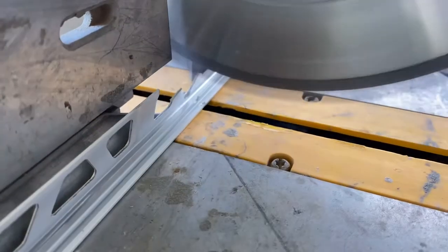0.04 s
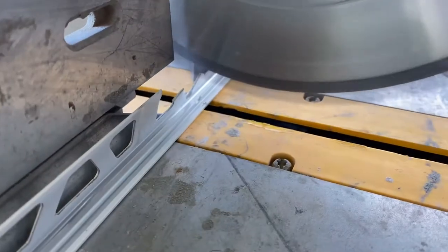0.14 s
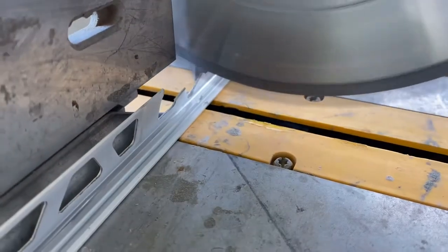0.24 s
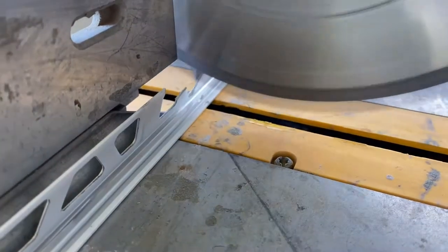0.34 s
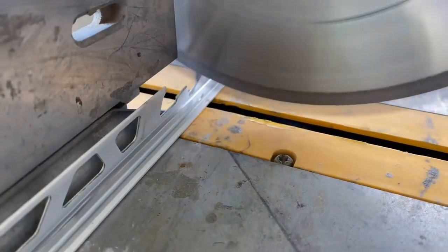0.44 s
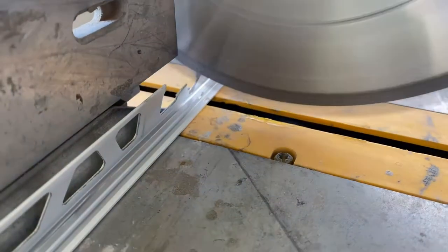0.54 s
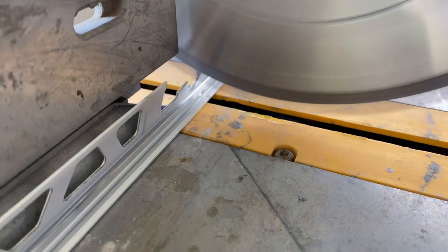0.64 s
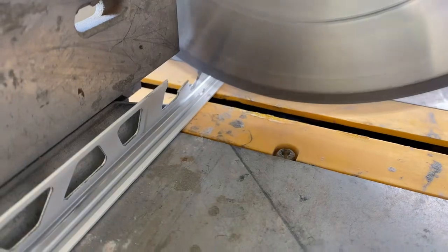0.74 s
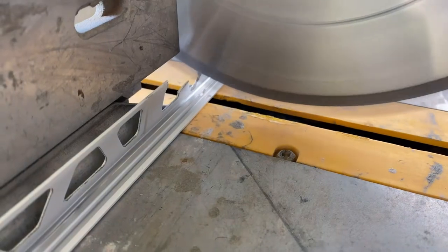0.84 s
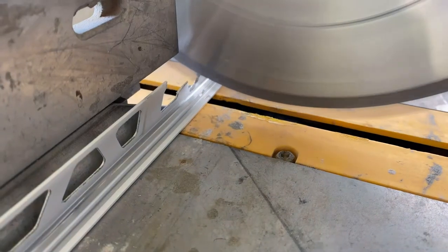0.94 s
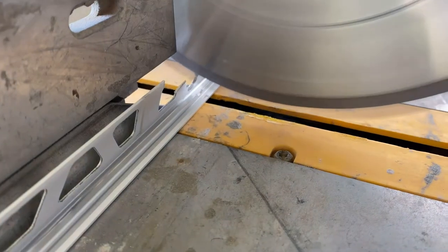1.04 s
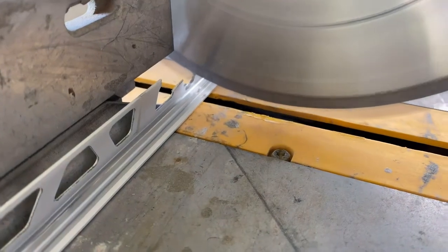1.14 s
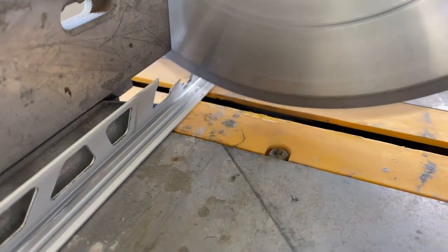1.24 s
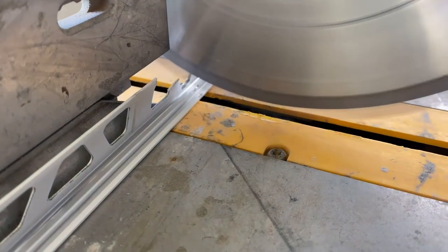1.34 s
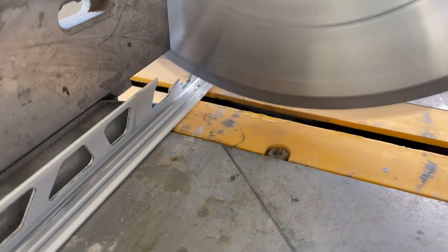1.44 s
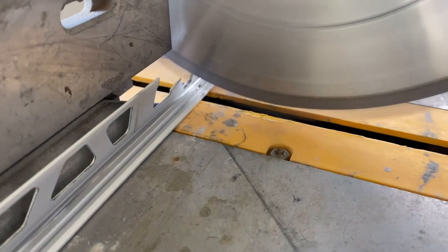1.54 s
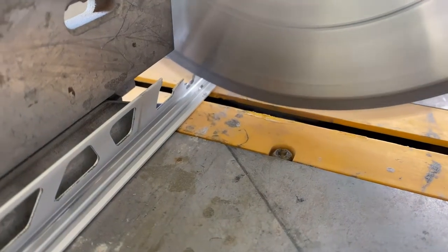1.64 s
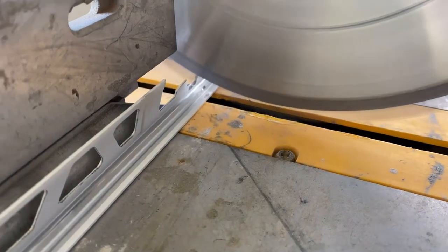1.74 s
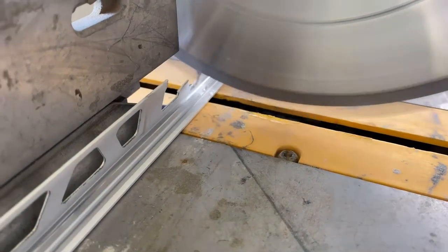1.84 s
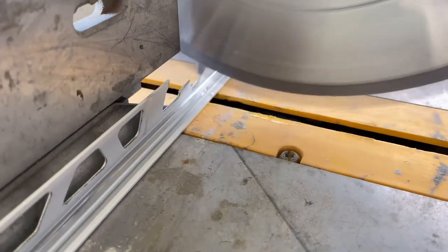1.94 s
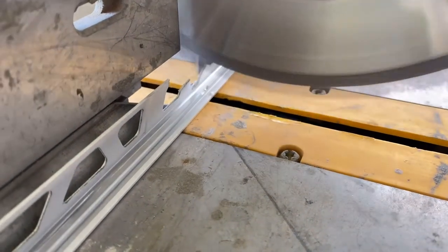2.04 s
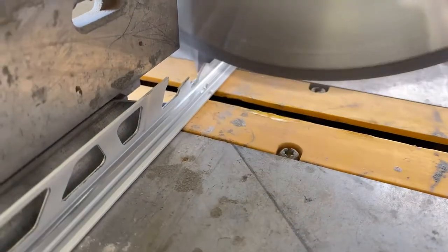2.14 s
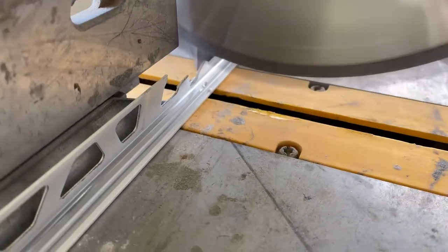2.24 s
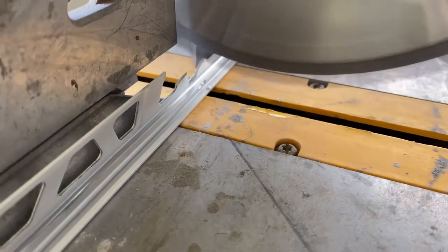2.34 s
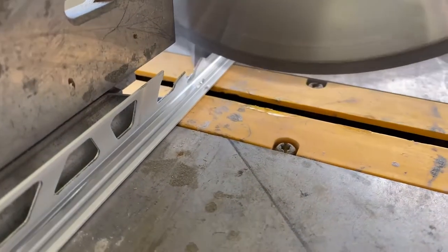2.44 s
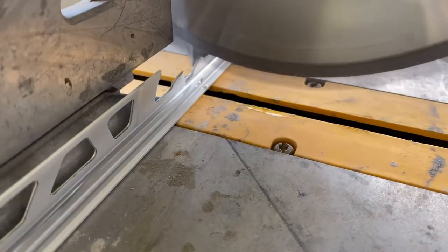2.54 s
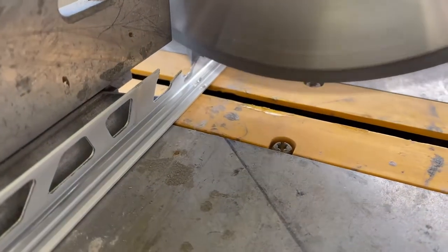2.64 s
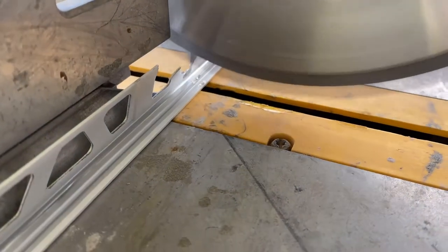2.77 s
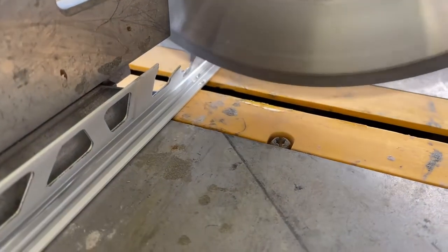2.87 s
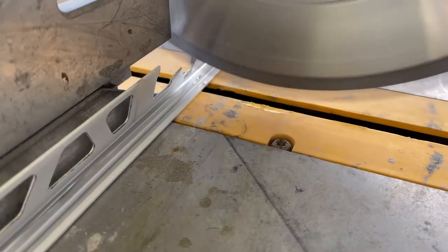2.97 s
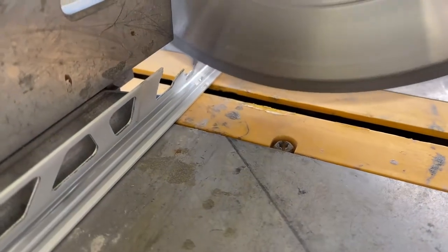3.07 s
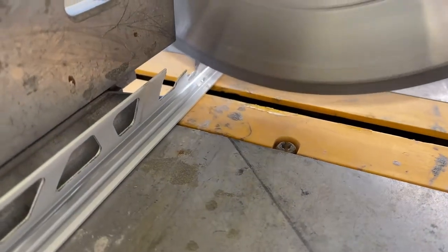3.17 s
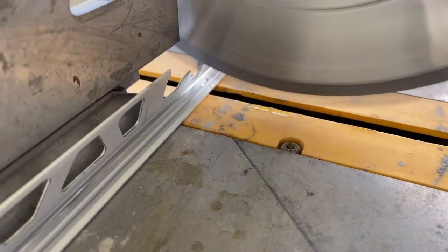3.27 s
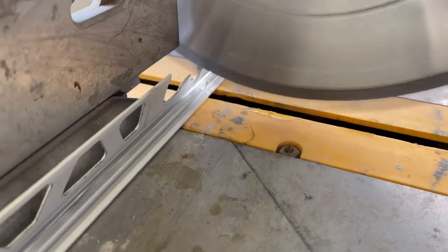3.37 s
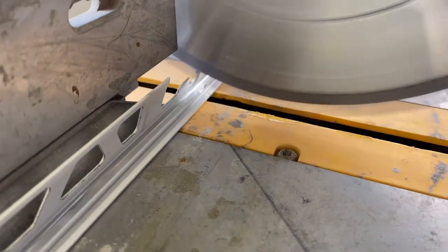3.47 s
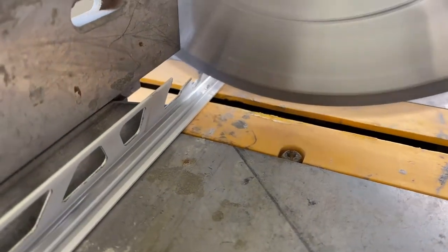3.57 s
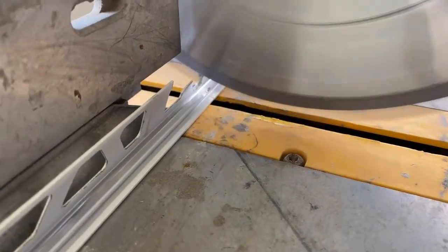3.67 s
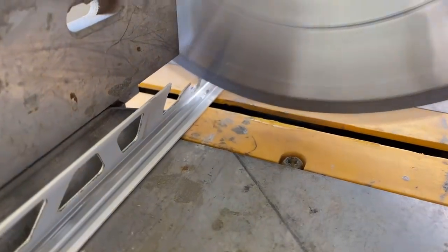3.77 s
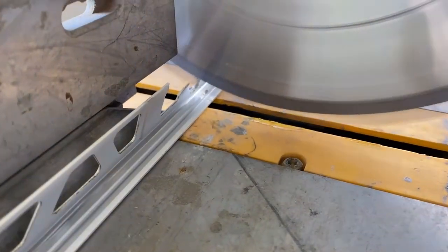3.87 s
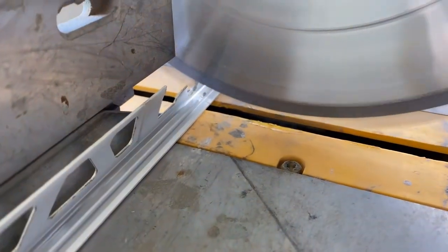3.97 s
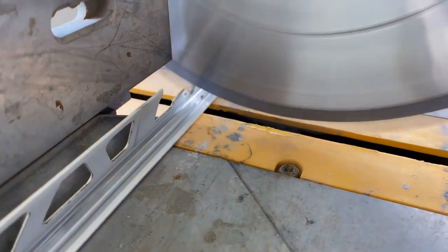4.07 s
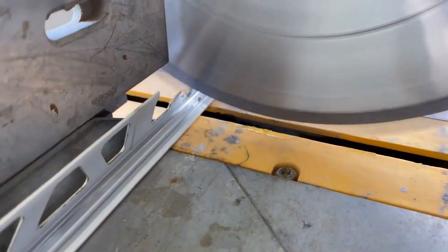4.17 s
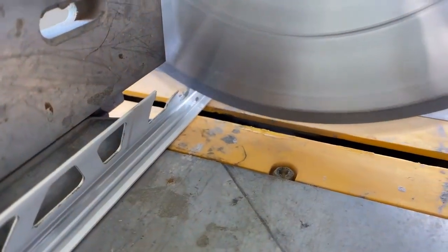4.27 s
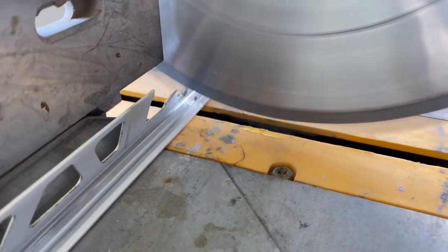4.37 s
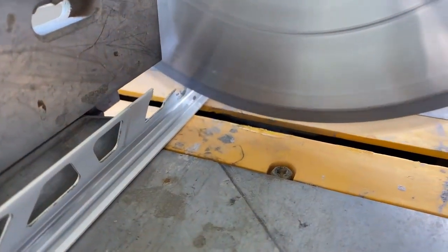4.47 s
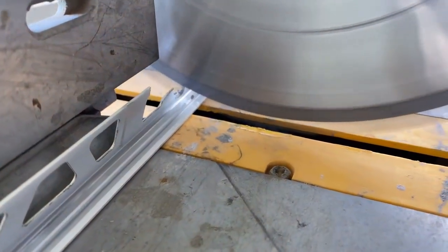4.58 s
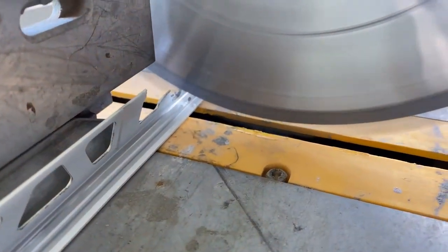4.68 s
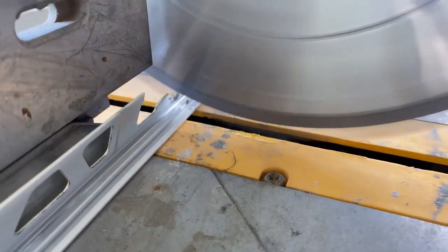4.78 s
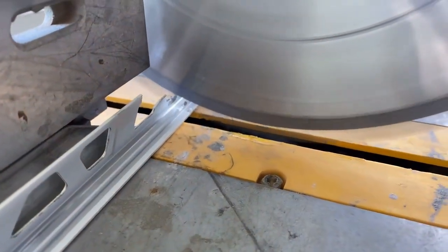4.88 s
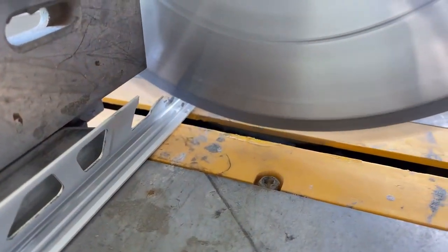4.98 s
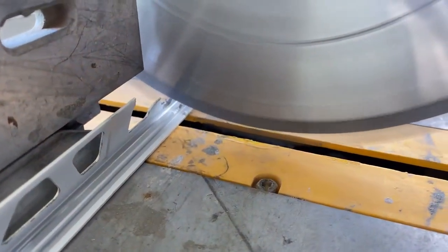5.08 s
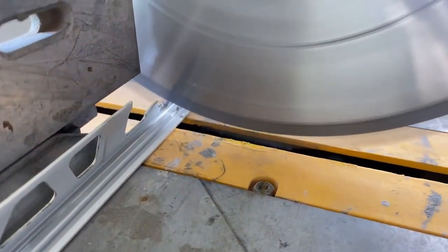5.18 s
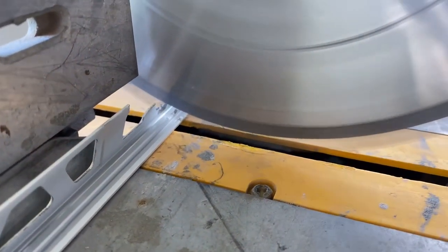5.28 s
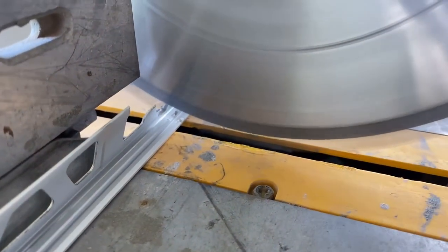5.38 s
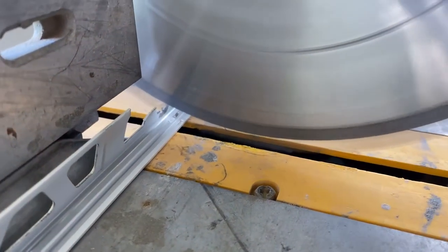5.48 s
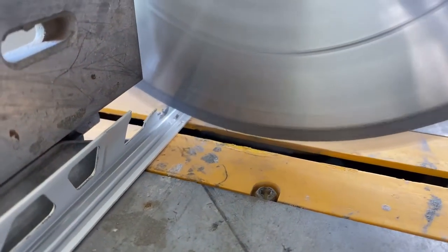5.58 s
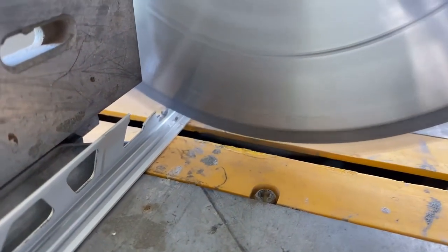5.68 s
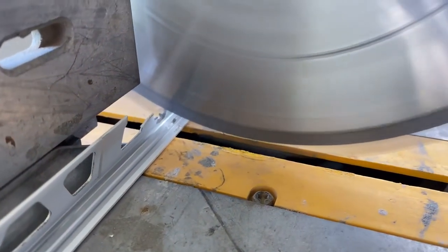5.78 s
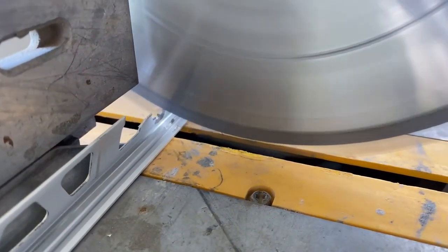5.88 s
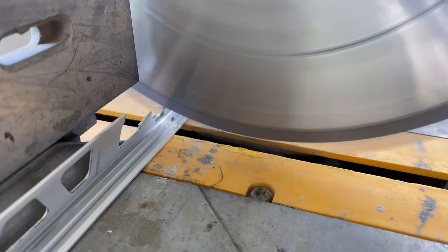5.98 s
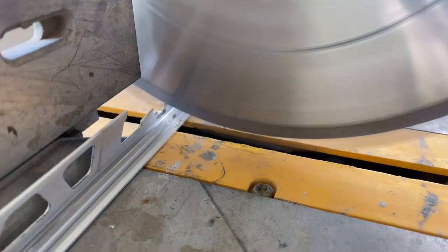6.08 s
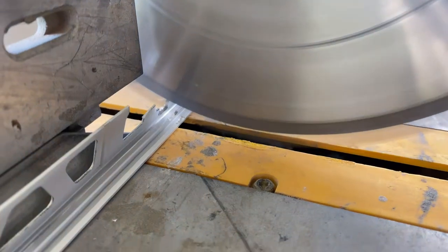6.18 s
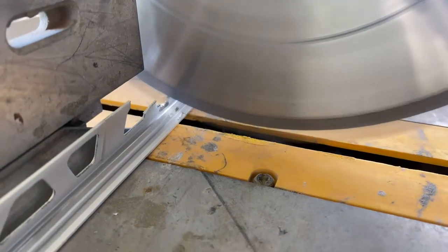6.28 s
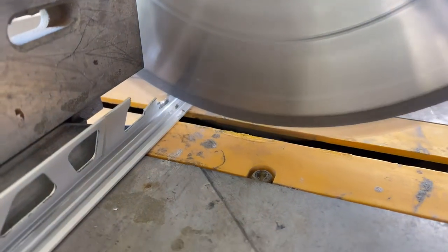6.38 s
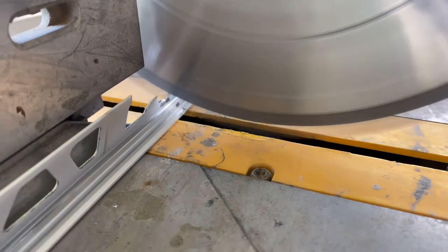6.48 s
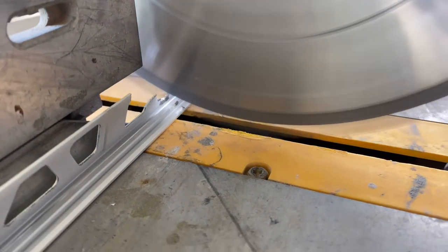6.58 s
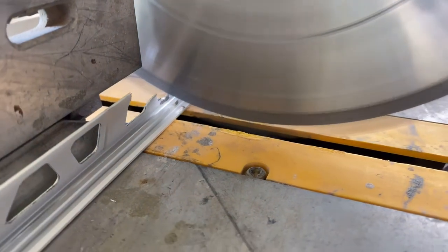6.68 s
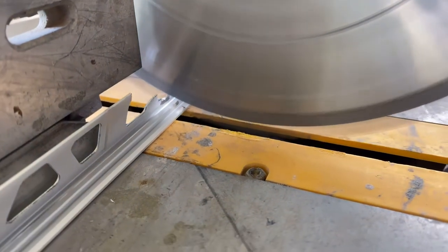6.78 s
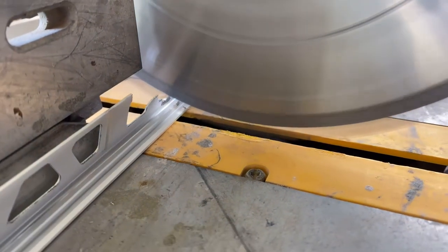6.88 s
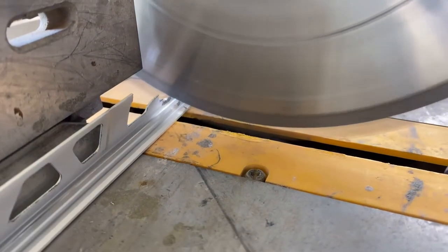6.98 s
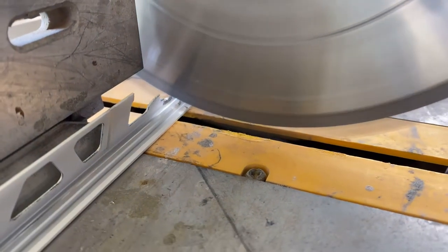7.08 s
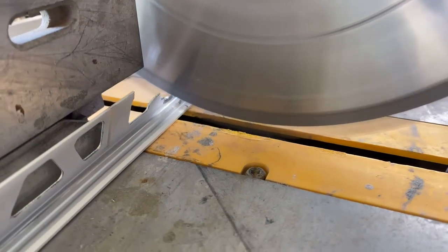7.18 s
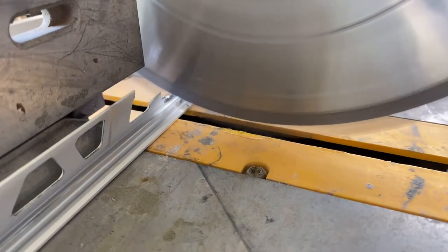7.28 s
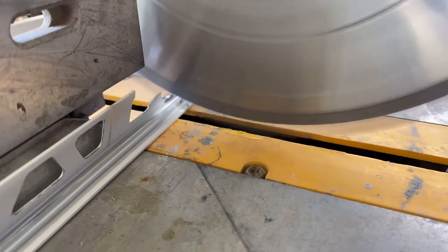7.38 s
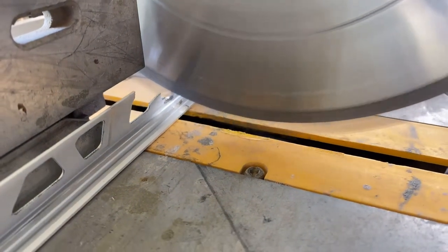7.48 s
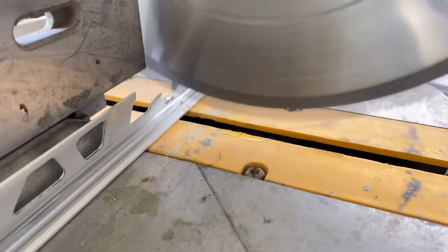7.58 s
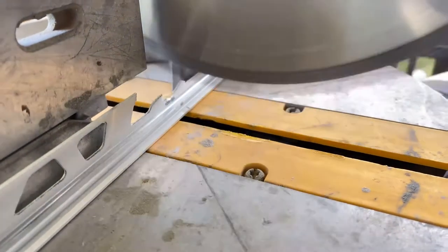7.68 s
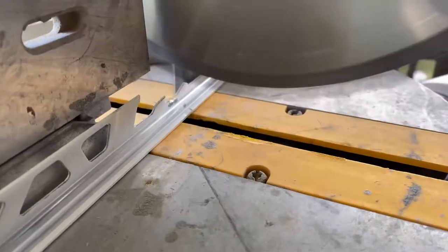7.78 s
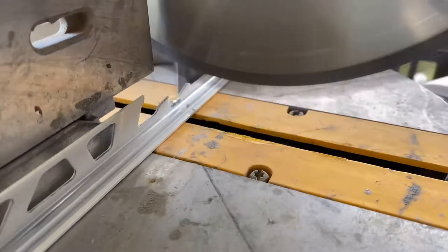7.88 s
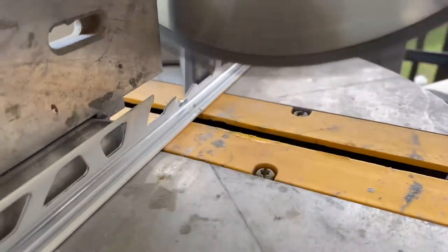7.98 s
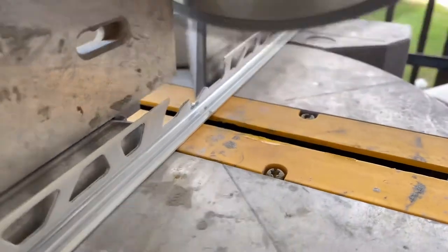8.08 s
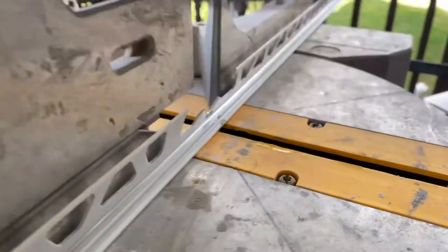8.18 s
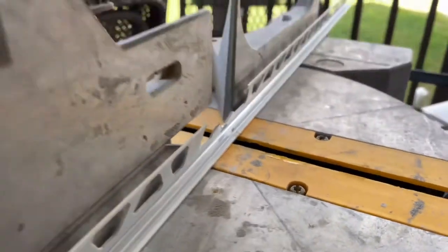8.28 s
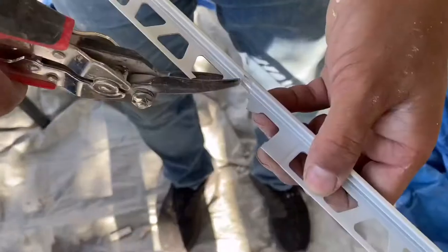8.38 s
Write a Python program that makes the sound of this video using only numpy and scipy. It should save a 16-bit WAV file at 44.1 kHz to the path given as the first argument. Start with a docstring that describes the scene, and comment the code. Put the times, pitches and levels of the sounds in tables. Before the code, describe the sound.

A mitre saw roars and whines close by, biting into an aluminium strip in several hissing, ringing passes before winding down.

```python
"""A mitre saw, close to a two-port microphone, bites an aluminium strip in short passes.
The motor roars and whines, the teeth hiss and the blade sings on multiples of its turning rate, while
a wind-like rumble buffets the microphone. Then the brake grips and the gears whine down.
The slowing saw and the faint yard behind it cut off abruptly; a different low hush follows.
Twice the microphone's low end thins out below a moving edge and creeps back."""
import sys
import numpy as np
from scipy import signal
from scipy.fft import rfft, irfft, next_fast_len
from scipy.io import wavfile
from scipy.ndimage import uniform_filter1d, map_coordinates

SR = 44100
rng = np.random.default_rng(int(sys.argv[2]) if len(sys.argv) > 2 else 0)


def materialize(psi):
    """Save the field psi as 16-bit PCM at rate SR to the path in sys.argv[1].

    A 1-D psi becomes a single channel; in a 2-D psi each row is a channel.
    """
    bounded = np.clip(np.atleast_2d(psi).T, -1, 1)
    quanta = np.round(bounded * 32767).astype(np.int16)
    wavfile.write(sys.argv[1], SR, quanta)


N = 371322

# blade speed under power, then under the brake: t/s, rate/(turns per s)
RUNNING_SPEED = [(0, 80.82), (.42, 81.22), (.75, 81.12), (1.15, 80.85), (1.55, 80.63), (2, 80.81),
                 (2.8, 81.07), (3.6, 81.2), (4.2, 81.12), (5.25, 81.05), (5.85, 80.84), (6.2, 80.68),
                 (6.9, 80.86), (7.5, 80.92)]
BRAKING_SPEED = [(7.601, 81), (7.62, 78.6), (7.68, 67.9), (7.75, 58.5), (7.83, 47), (7.9, 39.7),
                 (7.94, 36.5), (8.0, 31), (8.09, 27), (8.16, 23), (8.24, 19.9), (8.32, 17)]
# spectra of motor air, teeth, microphone rumble, yard, casing and hush: f/Hz, relative level/dB
ROAR_SPECTRUM = [(20, -31), (70, -17), (300, -10.5), (550, 0.5), (680, -0.5), (760, 1), (860, 0.5),
                 (1200, -4.5), (1500, -24.5), (2400, -10.5), (2800, -10), (3020, -3), (3300, -5),
                 (4100, -1.5), (4600, -1), (5100, -2), (5500, -6), (6100, -2.5), (7200, -10), (8000, -16),
                 (14300, -18), (14600, -43.5), (16000, -47)]
HISS_SPECTRUM = [(20, -46), (300, 1), (900, -15), (1400, -5.5), (2200, -3.5), (3200, -2.5), (4300, 1.5),
                 (6000, 3), (7000, 0.5), (8000, 5), (9000, 1), (10000, 0.5), (11400, 5.5), (11900, 6),
                 (12300, 6), (12700, -1), (13000, 3), (14500, -9), (16000, -10)]
RUMBLE_SPECTRUM = [(20, -22), (60, 1), (160, 5), (400, -4.5), (900, -24), (2000, -68)]
YARD_SPECTRUM = [(20, -21), (120, 6.5), (300, -18), (800, 9.5), (1200, 5.5), (2000, 7.5), (4000, -5.5),
                 (5500, -4), (9000, -30), (13000, -25), (16000, -48)]
CASING_SPECTRUM = [(2500, -39), (2850, -1), (3100, -4), (3400, -5), (4000, -37)]
HUSH_SPECTRUM = [(20, -6), (100, 2), (350, 13), (480, -3), (700, -12), (2000, -18), (8000, -33.5),
                 (16000, -44)]
# course of the motor's roar: t/s, relative level/dB
ROAR_LEVEL = [(0, -35), (.44, -32), (.95, -34.5), (1.1, -36), (1.9, -36), (2.7, -34), (3.93, -33),
              (4.1, -32), (5.8, -31.5), (6.2, -36), (6.5, -35), (7.6, -34.5)]
# tones of the motor shaft and of the blade shaft: multiple, relative level/dB
ROTOR_TONES = [(1, -47.5), (2, -38.5), (3, -59), (8, -50.5), (19, -42)]
SPINDLE_TONES = [(1, -49), (2, -57), (3, -48), (50, -50.5)]
# the motor's hum, sinking while the teeth bite hardest: t/s, gain/dB
HUM_GAIN = [(0, -2.5), (.7, 0), (.86, -19), (1.45, -5), (1.72, -0.5), (5.84, 1.5), (5.96, -17), (6.15, -5),
            (6.42, -5), (6.52, 5.5), (6.72, -0.5), (8.4, 1)]
# pressure of the teeth on the strip, heard as hiss: t/s, relative level/dB, tilt/(dB per octave)
FEED = [(0, -48, -2), (.41, -47.5, -1), (.44, -32, -0.5), (.94, -29.5, -3.5), (1.04, -31, -2.5),
        (1.5, -31.5, -1), (1.63, -35, 0), (1.77, -48.5, -2.5), (3.93, -46, -3), (3.97, -36, 0),
        (4.06, -33, 0), (4.44, -40, -0.5), (5.28, -34, 0), (5.5, -32.5, 0), (5.9, -28.5, -0.5),
        (6.08, -27.5, -3), (6.24, -30, -2), (6.38, -41, -2.5), (6.7, -41.5, -1), (7.04, -36.5, 1),
        (7.2, -34.5, 1.5), (7.4, -49, 0), (7.6, -45.5, -2)]
# brief jolts in the rumble: t/s, relative level/dB
JOLTS = [(4.06, -42), (4.75, -51), (5.28, -57), (5.48, -49), (7.03, -45), (7.65, -44)]
# the blade's loudest notes, then the gear whistles:
# start/s, peak/s, end/s, multiple of the blade's rate, relative level/dB
BLADE_NOTES = [(.44, .47, .52, 50, -33), (.43, .8, 1.55, 100, -28), (.45, .48, .55, 73, -36),
               (.45, .5, .58, 69, -34), (.46, .6, .9, 63, -34), (.46, .52, .69, 67, -30),
               (.46, .57, .65, 121, -32), (.47, .59, .73, 97, -31), (.48, .63, .74, 87, -34),
               (.7, .84, .9, 73, -35), (.69, .82, 1.3, 50, -29.5), (1.34, 1.4, 1.7, 50, -36),
               (1.17, 1.26, 1.39, 141, -34.5), (1.18, 1.25, 1.32, 117, -36.5),
               (1.38, 1.44, 1.56, 139, -35.5), (3.2, 5.1, 5.4, 100, -35), (3.965, 4.03, 4.12, 50, -24.5),
               (4.15, 4.18, 4.26, 50, -34), (3.96, 4.05, 4.15, 150, -29), (4.62, 4.9, 5.42, 151, -34),
               (4.75, 5.08, 5.7, 150, -33), (4.79, 4.9, 5.2, 50, -37), (4.87, 5.15, 5.22, 154, -35),
               (4.4, 4.5, 4.75, 152, -39), (4.73, 5.0, 5.3, 137, -38), (5.3, 5.45, 5.58, 152, -36),
               (5.4, 5.65, 5.9, 50, -40), (.48, .56, .72, 53, -32), (.45, .52, .71, 124, -35),
               (5.68, 5.78, 5.9, 81, -34), (5.81, 5.9, 6.05, 130, -35), (5.58, 5.8, 5.88, 69, -32),
               (5.59, 5.63, 5.69, 53, -29), (5.76, 5.85, 5.89, 53, -34), (6.04, 6.09, 6.13, 53, -32),
               (5.56, 5.82, 5.9, 73, -30), (6.16, 6.2, 6.26, 73, -36), (5.56, 5.69, 5.84, 144, -33),
               (5.62, 5.75, 6.1, 96, -31), (5.64, 5.82, 5.97, 117, -32), (5.74, 5.78, 5.88, 55, -37),
               (5.8, 5.89, 6.06, 141, -25), (5.85, 5.96, 6.03, 124, -33), (5.88, 6.03, 6.17, 115, -34),
               (5.97, 6.21, 6.31, 46, -24.5), (6.34, 6.36, 6.43, 46, -36), (5.94, 6.0, 6.14, 125, -29),
               (6.04, 6.13, 6.26, 139, -30), (6.1, 7.0, 7.4, 100, -36), (6.75, 7.05, 7.22, 150, -37)]
GEAR_WHISTLES = [(7.61, 7.63, 7.66, 19 * 14 / 3, -40), (7.63, 7.655, 7.68, 42, -25.5),
                 (7.72, 7.73, 7.75, 42, -49), (7.695, 7.715, 7.735, 63, -34), (7.79, 7.81, 7.83, 84, -42),
                 (7.74, 7.77, 7.8, 105, -47), (7.86, 7.88, 7.92, 126, -50), (7.83, 7.845, 7.86, 63, -44),
                 (7.88, 7.93, 7.94, 63, -50), (7.87, 7.9, 7.94, 84, -50), (7.93, 8.03, 8.14, 14, -52),
                 (7.98, 8.13, 8.21, 14 / 3, -53), (8.0, 8.07, 8.09, 126, -50), (8.02, 8.05, 8.12, 41, -50),
                 (8.06, 8.08, 8.125, 45, -53), (7.95, 8.0, 8.03, 45, -57), (8.16, 8.22, 8.24, 126, -58),
                 (8.18, 8.195, 8.21, 189, -55), (8.28, 8.305, 8.32, 280, -59), (8.19, 8.22, 8.32, 42, -57),
                 (8.27, 8.29, 8.31, 189, -53)]
# right channel against left; near 12 kHz the two sound in opposite phase:
# f/Hz, left louder by/dB, likeness 0-1, right lag/rad
STEREO_IMAGE = [(0, -6, .7, 2), (101, 5, 0.3, 0.34), (390, 3.5, 0.7, 0.37), (737, 10, 0.89, 1.1),
                (857, 12.5, 0.55, 6.1), (1017, 3, 1, 4.2), (1366, 1, 0, 6.9), (2230, -0.5, 0.94, 11.03),
                (2920, 5, 0, 12.23), (4040, 7.5, 0.56, 19), (4830, 3, 0.27, 21.76), (5400, 14.5, 0.3, 24.2),
                (7160, 4, 0, 29.2), (7870, 6, 1, 37.6), (7845, -3, 0.93, 35.8), (7900, -6, 0.7, 35.45),
                (8180, 2.5, 0.98, 34.5), (9040, 3.5, 0.7, 32.1), (9870, -2.5, 1, 31.9),
                (11300, 1.5, 0.07, 29.74), (11680, 0, 1, 9 * np.pi), (12380, 0, 1, 9 * np.pi),
                (12950, 0, 0.88, 28.3), (13180, 13.5, 0.9, 41), (13120, -5, 0.9, 25.2), (14200, 6, 1, 25.5),
                (15840, 1, 0.9, 17)]
# spells of thin low end: start/s, release/s, edge heads for f/Hz, loss below the edge/dB
THINNINGS = [(0.673, 1.64, 3920, 10.5), (5.948, 6.504, 3570, 11.5)]
# the microphone's moving low cut: t/s, corner f/Hz, loss under the knee/(dB per octave)
LOW_CUT = [(0, 25, 3.5), (.72, 29.6, 0.5), (.8, 132, 1), (.9, 210, 9), (1.0, 370, 40), (1.08, 497, 55),
           (1.25, 314, 11), (1.64, 254, 9), (1.85, 220, 19), (2.1, 120, 11), (2.64, 90.5, 3.5),
           (2.72, 24.7, 1.5), (5.9, 24.4, -0.5), (5.98, 50.2, 7.5), (6.07, 90, 4.5), (6.11, 221, 14.5),
           (6.58, 216, 11), (6.72, 80, 12.5), (7.0, 60, 11.5), (7.55, 60, 4), (7.62, 30, 3)]

TIME = np.arange(N) / SR
BRAKE_S, CUTOFF_S = BRAKING_SPEED[0][0], 8.322
GEAR_RATIO = 14 / 3  # motor turns per blade turn
ROAR_FADE, HISS_FADE, CASING_FADE = 2.37, 1.88, 1.9  # dB lost per dB of lost speed


def amp(db):
    return 10 ** (np.asarray(db) / 20)


def unit(x):
    return x / np.sqrt(np.mean(x ** 2) + 1e-20)


def curves(rows, at=TIME):
    """Each later column, interpolated along the first."""
    axis, *columns = np.transpose(rows)
    return [np.interp(at, axis, column) for column in columns]


def wobble(rate):
    """A smooth random curve, rate knots a second."""
    return map_coordinates(rng.standard_normal(int(N * rate / SR) + 4), [TIME * rate])


def filtered(x, response):
    """x times a complex response of frequency."""
    size = next_fast_len(N + SR // 2)
    return irfft(rfft(x, size) * response(np.fft.rfftfreq(size, 1 / SR)), size)[..., :N]


def coloured(x, spectrum):
    """x shaped by a spectrum on a log frequency axis, rms 1."""
    points_hz, db = np.transpose(spectrum)
    return unit(filtered(x, lambda hz: amp(np.interp(np.log(hz + 1), np.log(points_hz), db))))


def shaped(x, gain, size=1024):
    """x times gain(hz, t) on the short-time spectrum."""
    hz, t, frames = signal.stft(x, SR, nperseg=size)
    return signal.istft(frames * gain(hz[:, None], t), SR, nperseg=size)[1][..., :N]


def patchy(depth_db):
    """Two white noises sharing patches of random gain."""
    def gain(hz, t):
        bands = uniform_filter1d(rng.standard_normal((len(hz), len(t))), size=12, axis=0)
        return amp(depth_db * unit(uniform_filter1d(bands, size=6, axis=1)))
    return shaped(rng.standard_normal((2, N)), gain)


def repeating(turn, renew_hz, points=900):
    """Two noises that repeat with every turn while their pattern drifts."""
    patterns = rng.standard_normal((2, int(N * renew_hz / SR) + 2, points))
    place = [TIME * renew_hz, turn % 1 * points]
    return unit(np.array([map_coordinates(p, place, mode="grid-wrap") for p in patterns]))


def tone(cycles, db):
    """A sine of rms level db that wavers a little."""
    return np.sqrt(2) * amp(db + wobble(13)) * np.sin(2 * np.pi * cycles + 0.49 * wobble(10))


def motor_roar(turn, speed):
    """Air and brushes roar; as the fan slows, the shaft's beat takes over from the rush of air."""
    roar_db = curves(ROAR_LEVEL)[0] + 7 + ROAR_FADE * 20 * np.log10(speed)
    beat_share = np.clip(1.2 * (1 - speed), 0, .5)
    air = np.sqrt(1 - beat_share) * patchy(depth_db=1.26)
    beat = np.sqrt(beat_share) * repeating(GEAR_RATIO * turn, renew_hz=14, points=400)
    return amp(roar_db + 0.1 * wobble(7.3)) * coloured(air + beat, ROAR_SPECTRUM)


def shaft_whine(turn, speed):
    """Both shafts sound multiples of their rates, fading steeply as they slow."""
    hum_db = curves(HUM_GAIN)[0]
    rotor = sum(tone(k * GEAR_RATIO * turn, db + hum_db) for k, db in ROTOR_TONES)
    spindle = sum(tone(k * turn, db) for k, db in SPINDLE_TONES)
    return (rotor + spindle) * speed ** 9


def tooth_hiss(turn, bite_db, repeat_share=.55):
    """Teeth hiss on metal; part repeats each turn because the same teeth bite again."""
    repeated = np.sqrt(repeat_share) * repeating(turn, renew_hz=7)
    fresh = np.sqrt(1 - repeat_share) * patchy(depth_db=2.5)
    tilt = lambda hz, t: amp(curves(FEED, t)[1] * np.log2((hz + 300) / 10000))
    hiss = shaped(coloured(repeated + fresh, HISS_SPECTRUM), tilt)
    return amp(bite_db + 7.5 + 1.06 * wobble(11)) * hiss


def microphone_rumble(bite_db, idle_db=-48, jolt_s=.038):
    """Low, wind-like rumble buffets the microphone, stronger while the teeth bite."""
    buffeting = amp(-55 + 0.78 * (bite_db - idle_db))
    jolts = sum(amp(db) * np.exp(-((TIME - at) / jolt_s) ** 2) for at, db in JOLTS)
    flutter = amp(0.8 * wobble(10) + 2.7 * np.array([wobble(14), wobble(14)]))
    rumble = coloured(rng.standard_normal((2, N)) + .5 * rng.standard_normal(N), RUMBLE_SPECTRUM)
    return (buffeting + jolts) * flutter * amp([[3.5], [.4]]) * rumble


def yard():
    """Faint, patchy noise of the yard behind the saw."""
    return amp(-46.5) * coloured(patchy(depth_db=7.5), YARD_SPECTRUM)


def stereo(noise, tones):
    """The right channel is the left shifted in phase and level, with noise of its own."""
    def right(hz):
        louder_db, alike, lag = curves(STEREO_IMAGE, hz)
        alike = np.clip(alike, 0, 1)
        shift = amp(-louder_db) * np.exp(-1j * lag)
        return shift * [alike, np.sqrt(1 - alike ** 2), np.ones_like(hz)]
    return np.array([noise[0] + tones, filtered(np.array([*noise, tones]), right).sum(0)])


def blade_song(turn, faint_per_s=45, faint_s=.07):
    """Multiples swell as a blade mode catches them; faint ones come by chance and follow the hiss."""
    faint = []
    for slot in np.arange(0, BRAKE_S - .4, 1 / faint_per_s):
        delay, pitch, softness = rng.random(3)
        start = slot + delay / faint_per_s
        peak = start + faint_s / 2
        db = curves(FEED, peak)[0] - 9 - 6 * softness
        faint.append((start, peak, start + faint_s, round(45 + 111 * pitch), db))
    song, tremble = np.zeros(N), .5 * wobble(40)
    for start, peak, end, multiple, db in BLADE_NOTES + faint:
        span = slice(max(round((start - .04) * SR), 0), round((end + .035) * SR))
        swell_db = np.interp(TIME[span], [start - .04, start, peak, end, end + .04], [-37, -3, .5, -7, -32])
        phase = 2 * np.pi * multiple * turn[span] + tremble[span]
        song[span] += np.sqrt(2) * amp(db + swell_db) * np.sin(phase)
    return song * amp(1.6 * wobble(30))


def low_end_thinning(hz, t, rise_s=.21, fall_s=.39, knee_hz=624):
    """Microphone gain: a step below a moving edge, a slope under the knee and a steep low cut."""
    edge_hz, step_db = 340, 0
    for start, release, top_hz, loss_db in THINNINGS:
        rise = 1 - np.exp(-np.clip(t - start, 0, release - start) / rise_s)
        fall = np.exp(-np.maximum(t - release, 0) / fall_s)
        edge_hz = np.maximum(edge_hz, top_hz * rise * fall)
        held = release + .067
        step_db += np.interp(t, [start, start + .15, held, held + .23], [0, loss_db, loss_db, 0])
    cut_hz, slope_db = curves(LOW_CUT, t)
    octaves_below = lambda corner: np.maximum(np.log2(corner / (hz + 5)), 0)
    edge_db = step_db / (1 + (hz / edge_hz) ** 40)
    cut_db = np.minimum(75 * octaves_below(cut_hz), 52)
    return amp(-edge_db - slope_db * octaves_below(knee_hz) - cut_db)


def proud_tooth(turn, bite_db, start_s=.82, end_s=1.5, ring_hz=1500, decay_s=.0004):
    """For a while one proud tooth knocks the strip once a turn, each time with a new size."""
    hits = np.flatnonzero(np.diff(np.floor(turn - .7)))  # 0.7 of the way round
    hits = hits[(hits > start_s * SR) & (hits < end_s * SR)]
    blows, t = np.zeros(N), TIME[:200]
    blows[hits] = amp(bite_db[hits] + 14 + 4 * rng.standard_normal(len(hits)))
    return np.convolve(blows, np.sin(2 * np.pi * ring_hz * t) * np.exp(-t / decay_s))[:N]


def casing_rush(speed, rise_s=.12):
    """The gripping brake stirs the casing's resonance, a narrow band of noise."""
    grip = np.clip((TIME - BRAKE_S) / rise_s, 0, 1)
    rush = coloured(patchy(depth_db=1), CASING_SPECTRUM)
    return grip * amp(-38.5 + CASING_FADE * 20 * np.log10(speed)) * rush


def gear_whistles(turn, edge_s=.025):
    """Gear multiples glide down with the slowing blade in brief, rough whistles."""
    whistles, tremble = np.zeros(N), wobble(110)
    for start, peak, end, multiple, db in GEAR_WHISTLES:
        times = [0, start - edge_s, start, peak, end, end + edge_s, TIME[-1] + 1]
        swell_db = np.interp(TIME, times, [-90, -30, -3, 0, -4, -30, -300])
        phase = 2 * np.pi * multiple * turn + min(multiple / 130, .7) * tremble
        whistles += np.sqrt(2) * amp(db + swell_db) * np.sin(phase)
    return whistles * (TIME > BRAKE_S) * amp(2.5 * wobble(60))


def hush():
    """A low, steady hush, a different ambience from the yard."""
    return amp(-63) * coloured(rng.standard_normal(N), HUSH_SPECTRUM)


def scene():
    """The saw from close by; as it slows, saw and yard cut off abruptly and the hush follows."""
    rate = curves(RUNNING_SPEED + BRAKING_SPEED)[0]
    turn = np.cumsum(rate) / SR  # blade turns so far
    speed = rate / rate[0]
    bite_db = curves(FEED)[0] + HISS_FADE * 20 * np.log10(speed)
    roar, whine = motor_roar(turn, speed), shaft_whine(turn, speed)
    hiss, rumble = tooth_hiss(turn, bite_db), microphone_rumble(bite_db)
    noise = roar + hiss + yard() + casing_rush(speed)
    tones = whine + blade_song(turn) + proud_tooth(turn, bite_db) + gear_whistles(turn)
    sounding = np.clip((CUTOFF_S - TIME) / .015, 0, 1)
    return (stereo(noise, tones) + rumble) * sounding + hush() * (1 - sounding)


def record(dry):
    """At the microphone the low end thins and returns; nothing passes above 15680 Hz."""
    return filtered(shaped(dry, low_end_thinning, size=2048), lambda hz: hz < 15680)


dry = scene()
out = record(dry)
materialize(out)
```